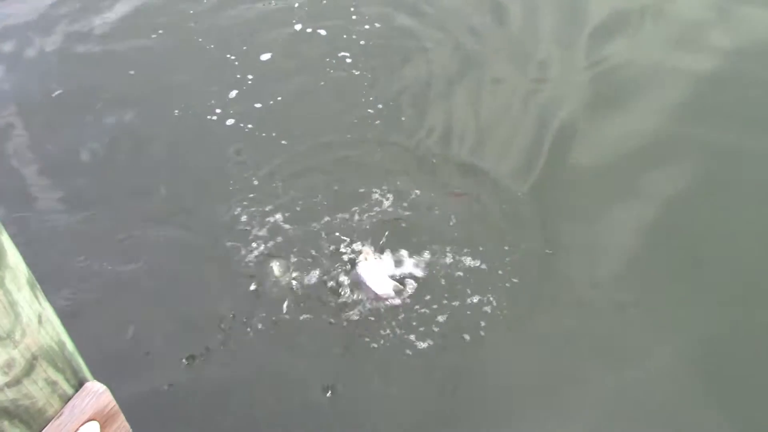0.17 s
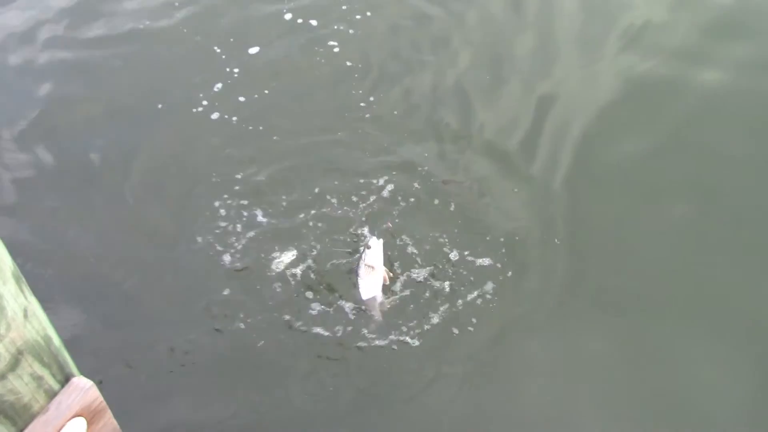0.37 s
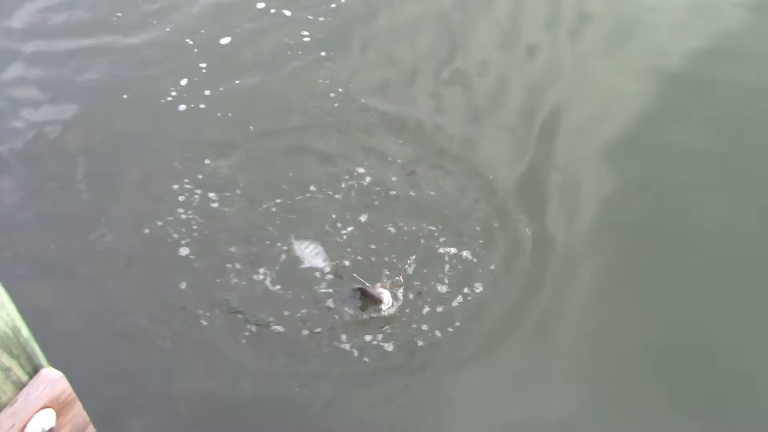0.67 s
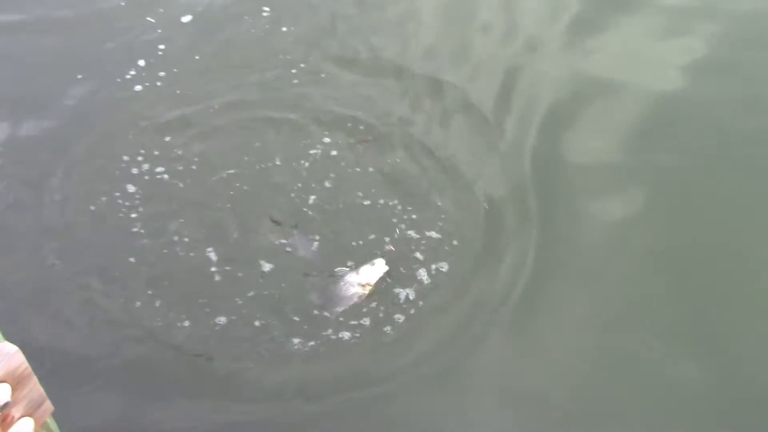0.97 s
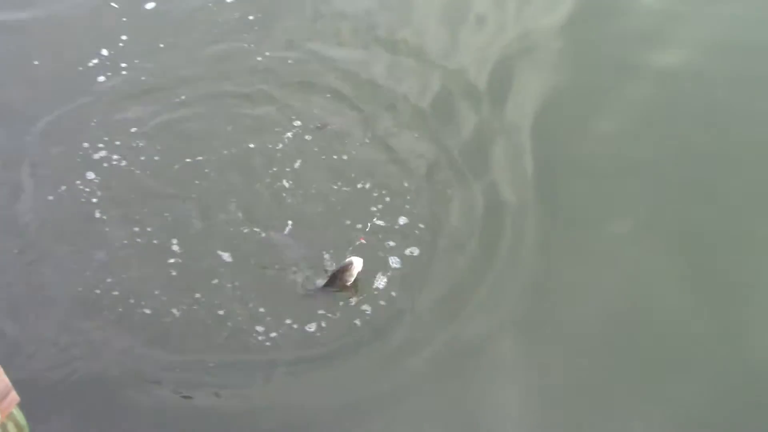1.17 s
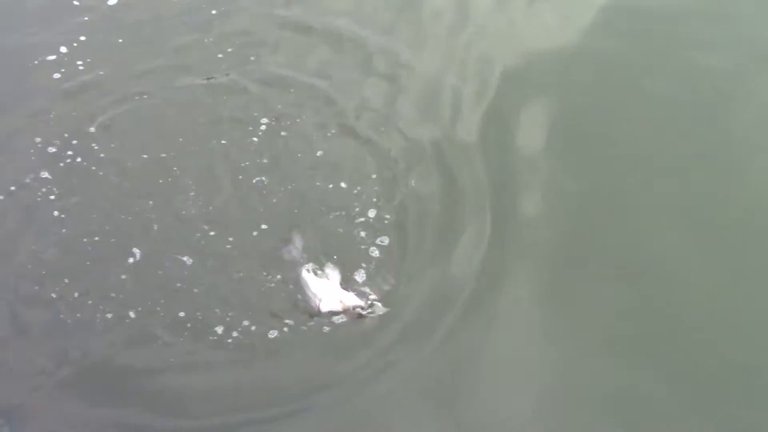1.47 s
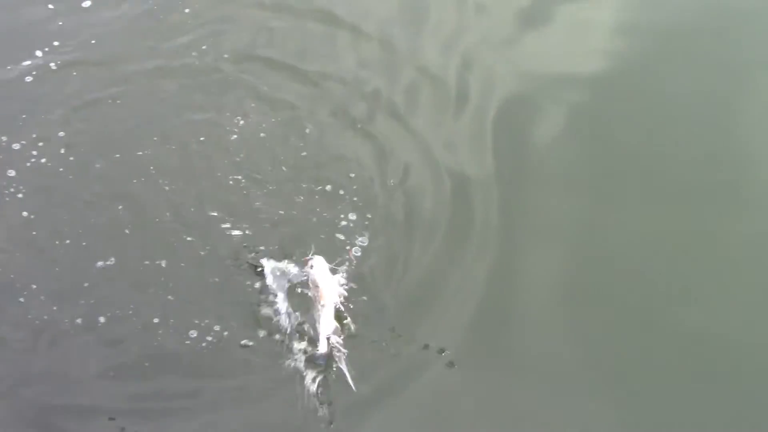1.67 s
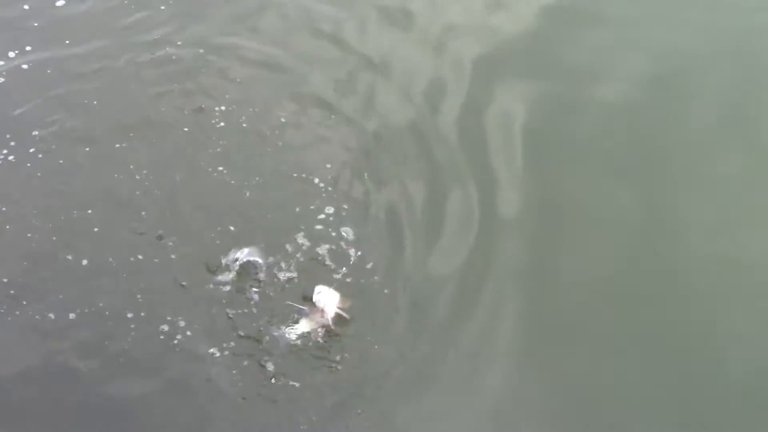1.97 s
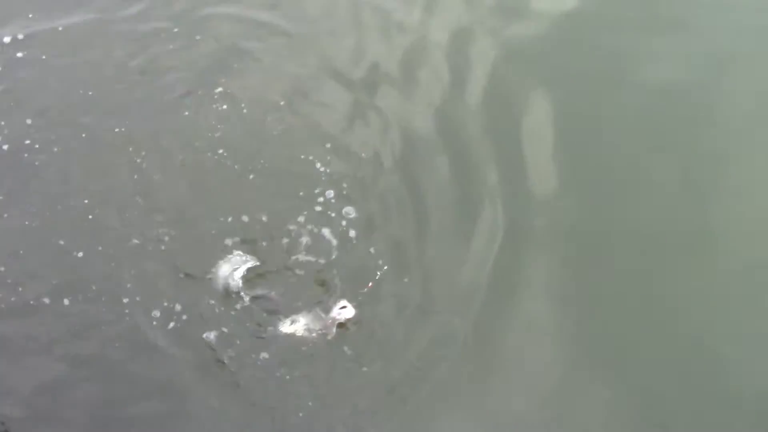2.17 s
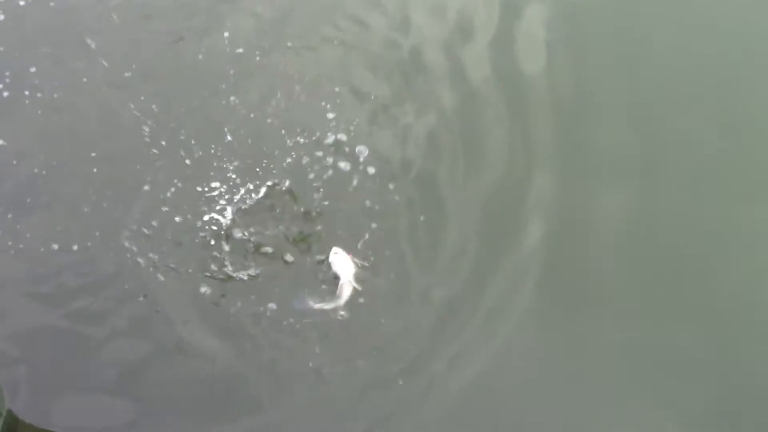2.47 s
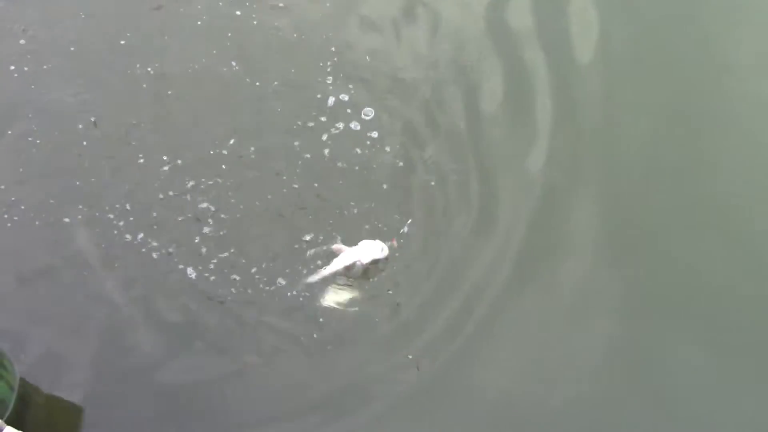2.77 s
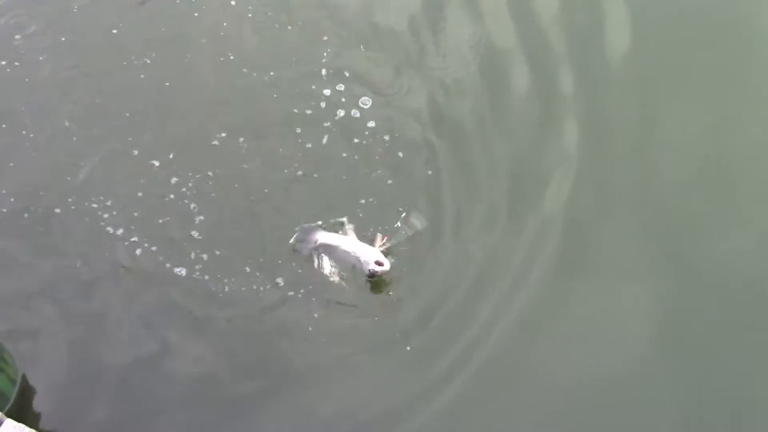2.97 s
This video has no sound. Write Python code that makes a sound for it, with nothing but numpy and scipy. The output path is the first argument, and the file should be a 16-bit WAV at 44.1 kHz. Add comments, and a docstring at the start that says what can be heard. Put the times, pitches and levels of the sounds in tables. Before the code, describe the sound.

A fish thrashes on the water with wet slaps, spray and bubbly plops in three bouts; a sharp clack sounds close to the microphone early on, over soft wind and water wash outdoors.

```python
"""Slaps, pattering spray and ringing bubbles open the scene: a hooked fish thrashes below a railing.
It thrashes in three bouts: slaps are noise bursts, bubbles gliding sine tones, drops plips and splats.
One hard clack close by, probably tackle on the rail, rings damped modes.
Coloured noise makes the steady wash of wind and water; noise echoes scatter the fish off the pier."""
import sys
import numpy as np
from scipy import signal
from scipy.fft import rfft, irfft
from scipy.io import wavfile

SR = 44100
rng = np.random.default_rng(int(sys.argv[2]) if len(sys.argv) > 2 else 0)


def output_pcm(signal):
    """Save a mono or channel-first signal as 16-bit PCM at the path in sys.argv[1].

    Samples are clipped to [-1, 1] before scaling.
    """
    pcm = np.clip(np.atleast_2d(signal).T, -1, 1) * 32767
    wavfile.write(sys.argv[1], SR, np.round(pcm).astype(np.int16))


N = 137151
T = np.arange(N) / SR


def from_db(db):
    """Decibels to gain."""
    return 10 ** (np.asarray(db) / 20)


def rms_one(x):
    """Scale to unit power."""
    return x / np.sqrt(np.mean(x ** 2) + 1e-20)


def at_hz(points, hz):
    """Read a spectrum in dB on a log frequency axis."""
    f, db = np.transpose(points)
    return np.interp(np.log(np.maximum(hz, 1)), np.log(f), db)


def level(rows):
    """Gain over time from a dB curve."""
    return from_db(np.interp(T, *np.transpose(rows)))


def fade(t, t60):
    """Exponential decay, 60 dB down after t60 seconds."""
    return np.exp(-np.log(1000) * t / max(t60, 1e-4))


def onset(t, attack):
    """Rounded rise to one."""
    return 1 - np.exp(-(t / attack) ** 2)


def add(out, s, sound):
    """Mix a sound in at a time in seconds."""
    i = max(int(s * SR), 0)
    out[i:i + len(sound)] += sound[:N - i]


def band(x, edges_hz):
    """Gentle band-pass."""
    edges_hz = np.clip(edges_hz, 10, SR / 2 - 10)
    return signal.sosfilt(signal.butter(2, edges_hz, "band", fs=SR, output="sos"), x)


def noise(spectrum):
    """Steady noise of a given colour, at unit power."""
    colour = from_db(at_hz(spectrum, np.fft.rfftfreq(N, 1 / SR)))
    return rms_one(irfft(rfft(rng.standard_normal(N)) * colour, N))


# Colour of wind and water, relative: f/Hz, level/dB (per Hz)
WASH_COLOUR = [(25, -11), (70, -27.5), (110, -21.5), (160, -15.5), (250, -11.5), (400, -6), (560, -3),
               (750, 0.5), (1050, -3), (1420, -2), (1620, -10.5), (2100, -14.5), (3000, -26), (4500, -36.5),
               (9000, -37), (12000, -39), (16000, -51)]
# Swell of the wash: t/s, level/dB
WASH_SWELL = [(0, -35), (.45, -35.5), (.7, -35), (1.25, -37.5), (1.45, -34.5), (2.0, -37), (2.42, -36),
              (2.7, -35.5), (3.11, -35.5)]
# Soft hiss that grows towards the end: t/s, level/dB
HISS_SWELL = [(0, -79), (2.2, -64), (2.6, -61.5), (3.11, -55)]
HISS_HZ = (2420, 3660)
HUM_HZ, HUM_RMS_DB = 138.3, -68


def wash():
    """Wind and moving water as coloured noise, with a faint far sine hum and a band of hiss."""
    body = level(WASH_SWELL) * noise(WASH_COLOUR)
    hum = from_db(HUM_RMS_DB) * np.sqrt(2) * np.sin(2 * np.pi * HUM_HZ * T)
    hiss = level(HISS_SWELL) * rms_one(band(rng.standard_normal(N), HISS_HZ))
    return body + hum + hiss


DROP_CYCLES, DROP_RISE_CYCLES = 52, 2.4   # full ring time (60 dB down) and swell, in cycles


def plip(hz, length=1, size=3500):
    """A drop traps a tiny bubble, which swells and dies within a few dozen cycles."""
    t = T[:size]
    swell = onset(t, length * DROP_RISE_CYCLES / hz)
    return swell * fade(t, length * DROP_CYCLES / hz) * np.sin(2 * np.pi * hz * t)


LAPS_PER_S, LAP_DB, LAP_HZ = 110, -45, (505.4, 1485)
LAP_SPREAD_DB = -0.5   # scales an exponential draw, held to 2


def lapping(count=900):
    """Ripples keep closing over small pockets of air, each a soft plip at a random pitch."""
    out = np.zeros(N)
    low, high = LAP_HZ
    for when, pitch, chance in rng.random((count, 3))[:int(LAPS_PER_S * N / SR)]:
        hz = low * (high / low) ** pitch
        gain = from_db(LAP_SPREAD_DB * min(-np.log(1 - chance), 2))
        add(out, when * N / SR, gain * plip(hz))
    return from_db(LAP_DB) * rms_one(out)


# Ring of the hard object, relative: f/Hz, level/dB, t60/s
HARD_MODES = [(734, -9, 0.008), (1410, -2, 0.0065), (1840, 1.5, 0.012), (2670, -10, 0.013),
              (3435, 0.5, 0.011), (3920, -10.5, .014), (4320, -6.5, 0.0078), (5350, -14, 0.0094),
              (6400, -1.5, 0.0043), (7820, -13, 0.0066), (10100, -21, 0.009), (11500, -18, 0.0063),
              (13000, -13, 0.0043)]
# Its contacts: t/s, level/dB
CONTACTS = [(0.3537, -21.5), (0.3563, -0.5), (0.3628, -25)]
CLACK_ATTACK_S, CLACK_TAIL_DB, CLACK_TAIL_T60_S = 0.00058, -30, 0.068


def clack(size=5000):
    """A faint touch, a hard knock and a weak rebound ring the same damped modes, with a noisy tail."""
    out, t = np.zeros(N), T[:size]
    ring = np.zeros(size)
    for k, (hz, db, t60) in enumerate(HARD_MODES):
        sign = (-1) ** k   # neighbouring modes start in opposite directions
        ring += sign * from_db(db) * fade(t, t60) * np.sin(2 * np.pi * hz * t)
    hiss = rms_one(band(rng.standard_normal(size), (1500, 6000)))
    tail = from_db(CLACK_TAIL_DB) * fade(t, CLACK_TAIL_T60_S) * hiss
    for s, db in CONTACTS:
        add(out, s, from_db(db) * onset(t, CLACK_ATTACK_S) * (ring + tail))
    return band(out, (450, 18000))


ECHO_DB, ECHO_T60_S = -15.5, 0.065


def pier(x, size=8000):
    """Brief scatter from the posts and boards: convolution with a dying noise burst."""
    t = T[:size]
    echoes = band(rng.standard_normal(size), (300, 8000)) * fade(t, ECHO_T60_S) * onset(t, 0.0024)
    echoes /= np.sqrt(np.sum(echoes ** 2))
    return from_db(ECHO_DB) * signal.fftconvolve(x, echoes)[:N]


# Falling spray, which the ticks follow too: t/s, level/dB
SPRAY_SWELL = [(0, -46), (.03, -42), (.06, -40), (.12, -44.5), (.16, -42.5), (.2, -48.5), (.28, -46),
               (.35, -54.5), (.9, -59), (1.35, -59.5), (1.47, -52), (1.52, -44.5), (1.6, -45.5),
               (1.68, -43), (1.74, -47), (1.82, -45), (1.9, -55), (2.03, -50.5), (2.11, -52), (2.2, -51),
               (2.31, -42.5), (2.39, -52), (2.44, -52), (2.53, -50), (2.7, -62.5), (3.0, -63),
               (3.11, -49.5)]
# Colour of the spray, relative: f/Hz, level/dB
SPRAY_COLOUR = [(1500, 4.5), (2100, 1), (3000, 5.5), (4500, -4), (7000, 0), (9000, -1.5), (11500, -7.5),
                (15500, -4)]
DROPS_PER_S, DROP_SPREAD_DB = 2400, 5.5   # the spread scales an exponential draw
MIST_DB = -7.5   # relative to the droplets
SPRAY_SHORTEST_RING = 0.43   # share of a full ring: droplets range from ticks to plips


def spray(count=12000):
    """Small droplets of every pitch tick and plip at random, over a fine mist of noise."""
    out = np.zeros(N)
    low, high = SPRAY_COLOUR[0][0], SPRAY_COLOUR[-1][0]
    when, pitch, chance, ring = rng.random((count, 4))[:int(DROPS_PER_S * N / SR)].T
    pitches = low * (high / low) ** pitch
    lengths = SPRAY_SHORTEST_RING ** ring
    boosts_db = DROP_SPREAD_DB * np.minimum(-np.log(1 - chance), 3.5)
    # shorter rings are played louder
    gains = from_db(at_hz(SPRAY_COLOUR, pitches) + boosts_db) / np.sqrt(lengths)
    for s, hz, length, gain in zip(when * N / SR, pitches, lengths, gains):
        size = int(length * DROP_CYCLES / hz * SR) + 2
        add(out, s, gain * plip(hz, length, size=size))
    mist = rms_one(band(noise(SPRAY_COLOUR), (1500, 14000)))
    return level(SPRAY_SWELL) * (rms_one(out) + from_db(MIST_DB) * mist)


# Registers from big drops to small: low f/Hz, high f/Hz, level/dB (relative)
TICK_REGISTERS = [(1900, 4050, -1.5), (3500, 8300, -5), (5800, 10200, 1)]
TICKS_PER_S, TICK_DECAY_S = 420, 0.00045   # the rate is shared by all registers
TICK_DB, TICK_SPREAD_DB = -4.5, 3.5   # level relative to the spray curve; spread per exponential draw


def ticks():
    """Smaller drops hit the surface with a short crackle, duller or brighter with their size."""
    out, keep = np.zeros(N), np.exp(-1 / (TICK_DECAY_S * SR))
    for low, high, db in TICK_REGISTERS:
        sizes = from_db(TICK_SPREAD_DB * np.minimum(rng.exponential(1, N), 3))
        hits = sizes * (rng.random(N) < TICKS_PER_S / len(TICK_REGISTERS) / SR)
        decays = signal.lfilter([1], [1, -keep], hits + 1e-18)
        bursts = decays * rng.standard_normal(N)
        out += from_db(db) * rms_one(band(bursts, (low, high)))
    return level(SPRAY_SWELL) * from_db(TICK_DB) * rms_one(out)


SPLAT_ATTACK_S, SPLAT_DECAY_S, SPLAT_WIDTH_OCTAVES = 0.00019, 0.0012, 0.83


def splat(hz, size=500):
    """A drop bursting: brief crackle around a pitch, with the energy of one millisecond at unit power."""
    t, half = T[:size], 2 ** (SPLAT_WIDTH_OCTAVES / 2)
    shape = onset(t, SPLAT_ATTACK_S) * np.exp(-t / SPLAT_DECAY_S)
    burst = band(rng.standard_normal(size) * shape, (hz / half, hz * half))
    return rms_one(burst) * np.sqrt(SR / 1000 / size)


# Single drops that stand out and ring: t/s, f/Hz, level/dB
RINGING_DROPS = [(.24, 3370, -25.5), (.729, 6200, -37), (1.685, 3700, -24), (1.783, 10300, -23),
                 (1.853, 8060, -26), (2.026, 3010, -25), (2.084, 9300, -21), (2.096, 7100, -24.5),
                 (2.168, 7340, -28), (2.183, 2900, -29), (2.252, 9000, -18.5), (2.2991, 8950, -11.5),
                 (2.345, 4200, -29.5), (2.436, 4550, -27), (2.51, 3220, -26), (2.541, 8800, -20.5),
                 (3.081, 8300, -27)]
# Drops that burst without ringing: t/s, centre f/Hz, level/dB
BURSTING_DROPS = [(0.0136, 6200, -30), (0.0368, 7500, -33), (.0484, 5160, -33), (0.056, 5800, -33),
                  (.0845, 8100, -43), (.1093, 7400, -41), (0.126, 5100, -42), (0.133, 4400, -34),
                  (0.142, 5600, -39), (0.173, 5000, -44), (.1754, 5400, -44), (.1928, 7900, -52),
                  (.1982, 6600, -43), (.2032, 6900, -43), (.2118, 8100, -39), (0.239, 5760, -31.5),
                  (.2598, 6600, -46), (.2695, 7500, -44), (.2779, 6200, -44), (.2902, 8600, -45),
                  (.4461, 9000, -47), (.5493, 9800, -49), (.586, 9300, -45), (.6858, 7200, -51),
                  (1.373, 7300, -45), (1.5035, 7100, -27.5), (1.5084, 7700, -33), (1.5254, 8500, -43),
                  (1.5302, 7300, -42), (1.5388, 8800, -41), (1.5716, 6400, -29), (1.587, 5700, -37),
                  (1.6096, 6900, -33.5), (1.642, 10200, -36), (1.6571, 6300, -38), (1.661, 9500, -26.5),
                  (1.666, 6000, -28.5), (1.678, 8000, -37), (1.7, 6400, -37), (1.7245, 5900, -39),
                  (1.739, 4800, -39), (1.744, 7100, -46), (1.7528, 5500, -38), (1.7791, 5800, -35),
                  (1.79, 8900, -27.5), (1.8141, 10300, -29.5), (1.824, 6400, -28.5), (1.8355, 6100, -37),
                  (1.9246, 7200, -39.5), (1.9743, 5740, -41), (1.996, 4000, -43), (2.0268, 3600, -35),
                  (2.0624, 5900, -41), (2.068, 7600, -46), (2.107, 6800, -37), (2.118, 4300, -34.5),
                  (2.1736, 8700, -44), (2.241, 5800, -29.5), (2.2893, 4700, -33), (2.2917, 8260, -30),
                  (2.2993, 8800, -36), (2.3027, 4500, -29), (2.31, 7200, -36), (2.4086, 8300, -48),
                  (2.45, 8650, -41), (2.4954, 6200, -33.5), (2.5054, 5900, -38), (2.5236, 8700, -40),
                  (2.5358, 9200, -42), (2.5519, 8100, -44), (2.5906, 6500, -41.5), (2.621, 3950, -30.5),
                  (2.6239, 4900, -49), (2.8866, 6800, -45.5), (3.0225, 8000, -44), (3.0556, 5400, -45),
                  (3.067, 3480, -41), (3.0924, 4300, -44)]
DROP_SPLAT_DB, DROP_RING = -15, 0.91   # impact relative to its plip; share of a full ring


def drops():
    """The largest drops falling back: all burst on the surface, some also ring."""
    out = np.zeros(N)
    for s, hz, db in RINGING_DROPS:
        add(out, s, from_db(db) * plip(hz, DROP_RING))
        add(out, s, from_db(db + DROP_SPLAT_DB) * splat(hz))
    for s, hz, db in BURSTING_DROPS:
        add(out, s, from_db(db) * splat(hz))
    return out


# Air pockets: t/s, f/Hz (starting pitch), level/dB, t60/s, glide/(octaves per s, negative falls)
AIR_POCKETS = [(0.075, 1430, -13, 0.031, -20.5), (0.079, 1240, -13, 0.035, 2), (0.092, 617, -24, 0.031, 11),
               (.163, 1670, -17.5, 0.014, 0.5), (.212, 352.4, -30.5, 0.26, 1),
               (.214, 1082, -20.5, 0.059, 3), (0.233, 1354, -16, 0.017, 16), (.254, 540, -18.5, 0.026, 9),
               (.598, 600, -27, 0.1, -0.5), (.604, 840, -28, 0.065, 11), (.743, 886, -24.5, 0.062, 2),
               (.747, 600, -33, 0.046, 14), (.784, 1120, -25.5, 0.028, 3), (1.521, 1080, -23.5, .03, 5),
               (1.519, 1780, -21.5, 0.023, -2), (1.562, 600, -14, 0.027, 2), (1.562, 1176, -19.5, 0.031, 4),
               (1.563, 1604, -20.5, 0.053, -3.5), (1.582, 2210, -24, .03, 10),
               (1.583, 1570, -20, 0.019, 14), (1.631, 1800, -25, 0.023, 0), (1.659, 1120, -27, 0.032, 8),
               (1.638, 414, -21, 0.052, 23), (1.771, 614, -20, 0.042, 1), (1.79, 600, -25, 0.062, 9),
               (1.838, 1760, -30, 0.018, 3), (1.855, 915, -25.5, .06, 18.5),
               (1.867, 1150, -19.5, 0.035, 19), (1.875, 1626, -25, 0.037, 17), (1.968, 260, -33, 0.062, 20),
               (1.977, 320, -25.5, 0.038, 20), (1.997, 467, -33, .05, 6), (2.107, 1330, -22, 0.024, 13),
               (2.282, 760, -20.5, 0.083, 4), (2.2893, 1300, -14.5, 0.013, 3),
               (2.2921, 2130, -13.5, 0.01, 19), (2.3005, 2750, -25.5, 0.019, 3),
               (2.3297, 1264, 8.5, 0.0049, -22), (2.3327, 1050, -19, .014, -7),
               (2.3895, 860, -13.5, 0.0092, 0), (2.391, 524, -22.5, 0.075, 10), (2.425, 559, -29, 0.15, 12),
               (2.582, 1780, -27.5, 0.041, 9), (2.589, 1980, -32, 0.019, 25), (2.625, 1786, -22, 0.029, 14),
               (2.656, 576, -24, 0.053, 12), (2.663, 858, -24, 0.044, 4), (2.805, 560, -24.5, 0.1, 2.5),
               (2.806, 871, -23.5, 0.052, 5), (2.819, 894, -21.5, 0.04, -1.5), (2.879, 746, -21, 0.028, 3),
               (2.931, 1810, -32, 0.051, 5), (2.935, 1417, -26.5, 0.059, 3)]
BUBBLE_ATTACK_CYCLES, BUBBLE_FLUTTER = 1, 0.21   # flutter as a share of the tone
BUBBLE_LOW_CUT_SHARE = 0.42   # low cut as a share of the starting pitch


def bubbles(size=6000):
    """Each air pocket rings as a dying, fluttering tone, most gliding up as they near the surface."""
    out, t = np.zeros(N), T[:size]
    for s, hz, db, t60, glide in AIR_POCKETS:
        pitch = hz * 2 ** np.clip(glide * t, -1, 1)   # an octave at most
        phase = 2 * np.pi * np.cumsum(pitch) / SR
        flutter = BUBBLE_FLUTTER * rms_one(band(rng.standard_normal((2, size)), (40, 200)))
        tone = (1 + flutter[0]) * np.sin(phase) + flutter[1] * np.cos(phase)
        ring = onset(t, BUBBLE_ATTACK_CYCLES / hz) * fade(t, t60) * tone
        add(out, s, from_db(db) * band(ring, (BUBBLE_LOW_CUT_SHARE * hz, 8000)))
    return out


# Slaps and spatters: t/s, decay/s, body level/dB, middle level/dB, fizz level/dB
SLAPS = [(.044, 0.0065, -39, -30, -39), (.08, 0.011, -28.5, -46, -37.5), (0.106, 0.0022, -25.5, -45, -48),
         (.147, 0.0037, -25.5, -27.5, -30), (.469, .0014, -44, -36, -45), (1.496, 0.0073, -47, -35, -35.5),
         (1.511, 0.0034, -27, -39, -44), (1.5622, 0.0077, -26.5, -32.5, -30.5),
         (1.631, 0.0055, -29, -50, -52), (1.655, .007, -30, -34, -35), (1.816, 0.0047, -45, -27, -32.5),
         (1.838, 0.0044, -27, -37, -50), (2.031, 0.0018, -29, -32, -30.5), (2.103, 0.0063, -30.5, -37, -37),
         (2.289, .0017, -19, -40, -36), (2.3, 0.0048, -34, -30, -32), (2.31, .006, -22, -48, -46),
         (2.327, .003, -30, -45, -30), (2.425, .007, -37, -43, -38), (2.509, 0.0044, -39, -33.5, -39)]
BODY_HZ, MIDDLE_HZ, FIZZ_HZ = (1320, 2740), (2980, 6900), (6000, 10300)
SPLASH_GRAIN_DB, SPLASH_ATTACK_SHARE = 3, 0.23   # random grain spread; swell as a share of the decay


def splashes(size=4096):
    """Each slap is a quickly dying burst of grainy crackle in three registers."""
    out, t = np.zeros(N), T[:size]
    for s, decay, *levels in SLAPS:
        shape = onset(t, SPLASH_ATTACK_SHARE * decay) * np.exp(-t / decay)
        strength = np.sqrt(np.mean(shape ** 2))
        for db, edges in zip(levels, (BODY_HZ, MIDDLE_HZ, FIZZ_HZ)):
            grain_gains = from_db(SPLASH_GRAIN_DB * rng.standard_normal(size))
            grains = rng.standard_normal(size) * grain_gains
            add(out, s, from_db(db) * strength * rms_one(band(grains * shape, edges)))
    return out


def scene():
    """Wash and lapping behind, the clack close by, the fish and its pier scatter in front."""
    background = wash() + lapping()
    fish = spray() + ticks() + drops() + bubbles() + splashes()
    return (background + clack() + fish + pier(fish))[None]


MIC_LOW_CUT_HZ, CUTOFF_HZ = 117, 16400


def record(dry):
    """Loud peaks are rounded, the deep bass is thinned and the top is cut."""
    rounded = np.tanh(dry)
    low_cut = signal.butter(2, MIC_LOW_CUT_HZ, "high", fs=SR, output="sos")
    top_cut = signal.cheby2(20, 60, CUTOFF_HZ, fs=SR, output="sos")
    return signal.sosfilt(top_cut, signal.sosfilt(low_cut, rounded))


dry = scene()
out = record(dry)
output_pcm(out)
```